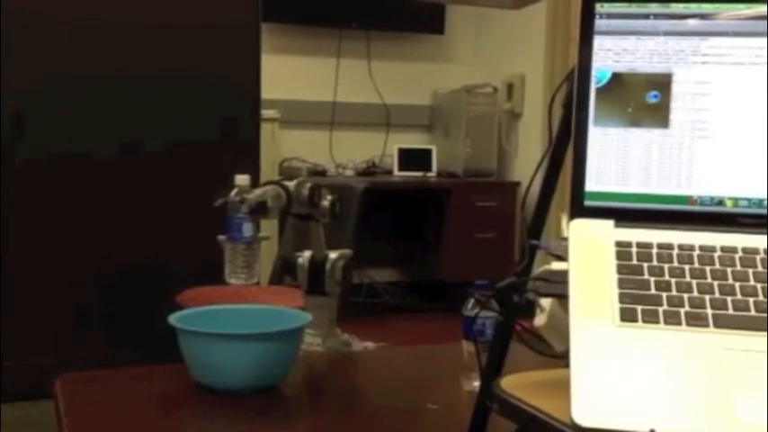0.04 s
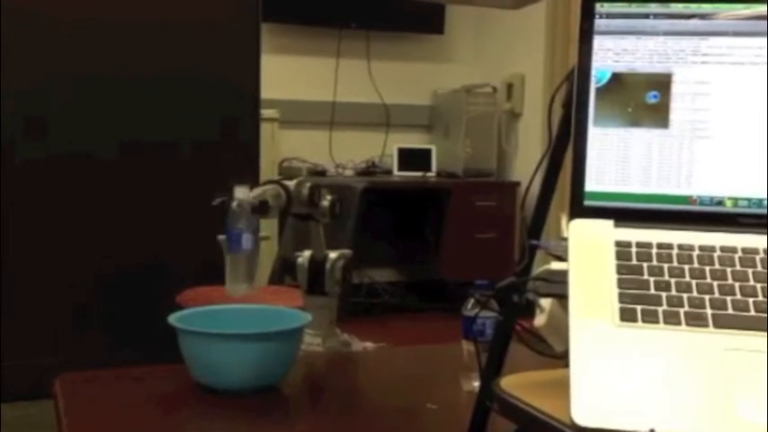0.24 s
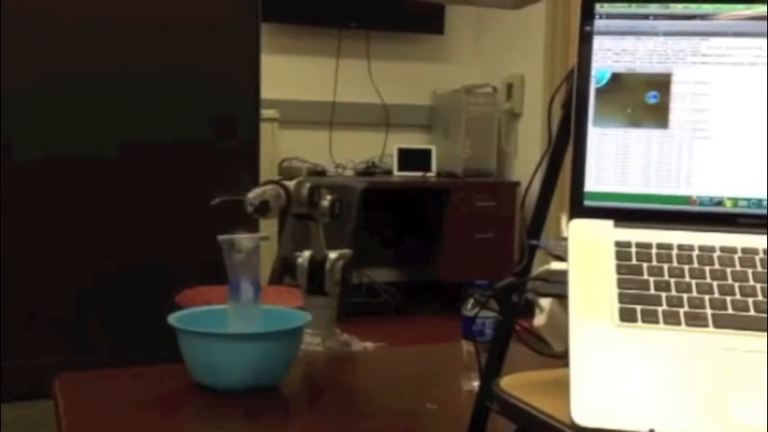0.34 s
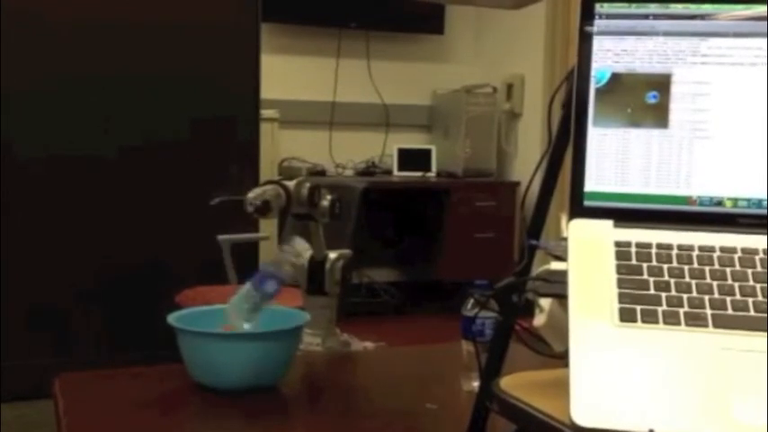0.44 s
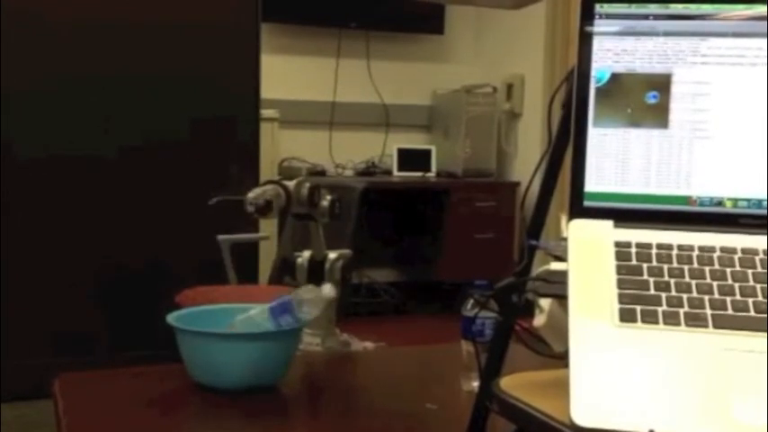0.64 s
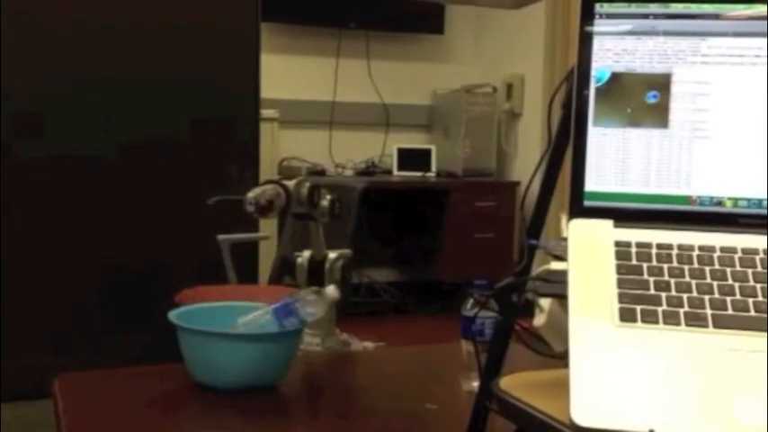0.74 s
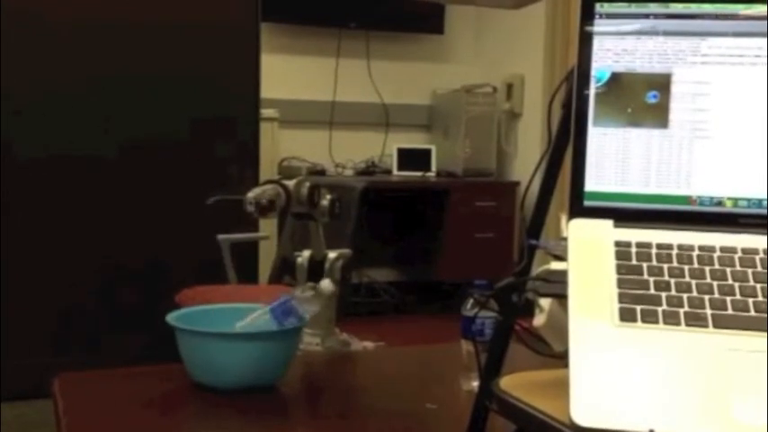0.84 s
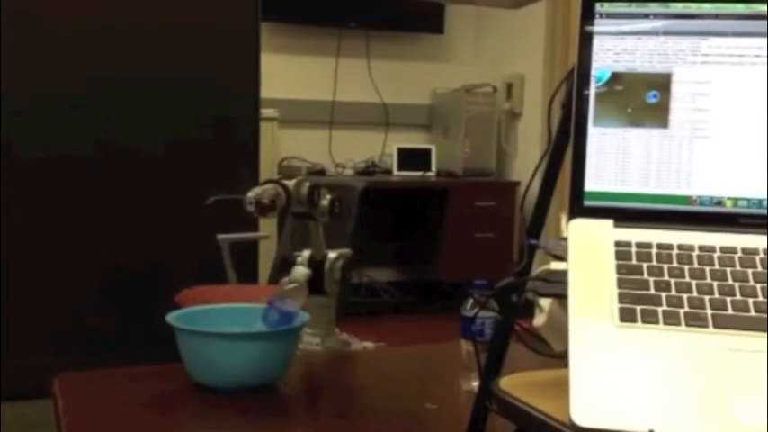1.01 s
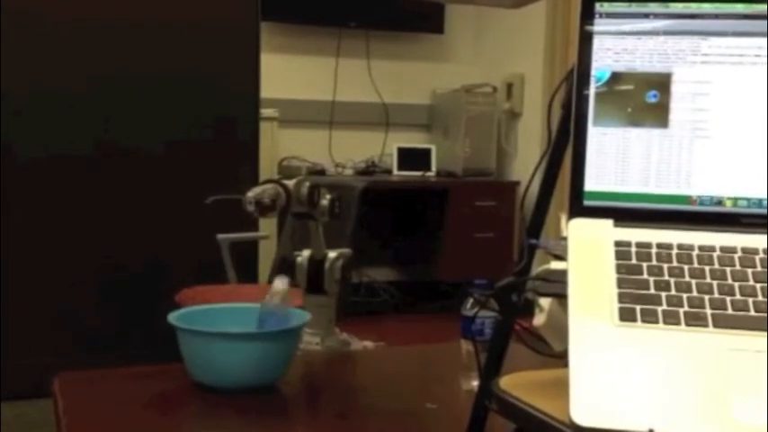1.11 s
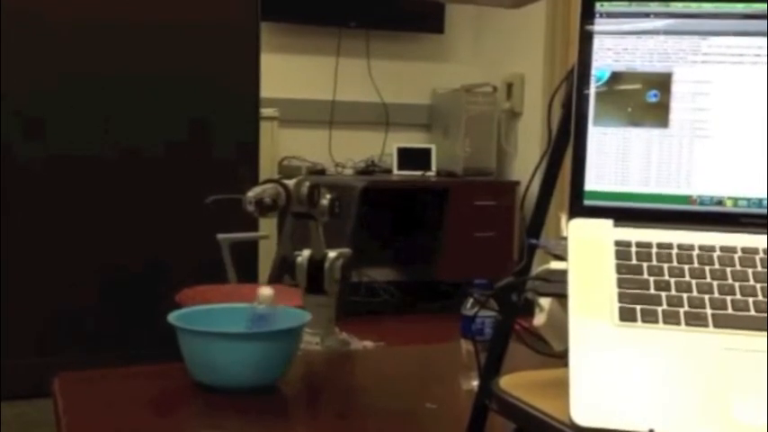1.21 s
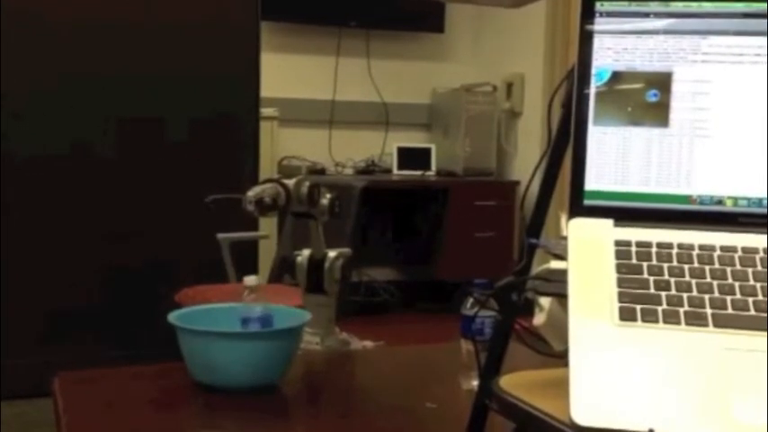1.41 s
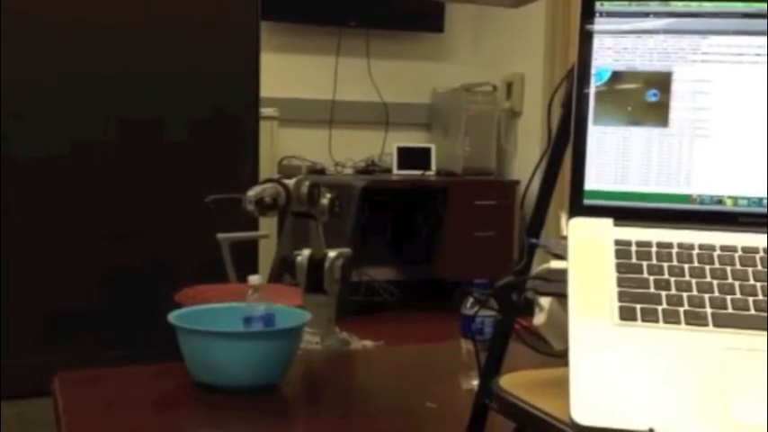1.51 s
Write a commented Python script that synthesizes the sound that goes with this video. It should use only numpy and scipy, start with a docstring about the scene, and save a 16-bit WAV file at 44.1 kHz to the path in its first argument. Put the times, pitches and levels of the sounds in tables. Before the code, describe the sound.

Thin plastic bottle clatters into a plastic bowl, then rocks with faint bumps.

```python
"""A thin plastic bottle drops into a plastic bowl on a table: small, quiet room, one microphone close by.
It clips the rim, squeaks down the wall, slams onto the bottom, tumbles and rocks to rest with faint bumps.
Each contact thumps the bowl and makes the bottle's shell knock, crack and crinkle. A few blows reach
the table top, and the flexing bottle ticks. Behind it are the room's short answer and a steady room tone."""
import sys
import numpy as np
from scipy import signal
from scipy.fft import rfft, irfft
from scipy.io import wavfile
from scipy.ndimage import uniform_filter1d

SR = 44100
rng = np.random.default_rng(int(sys.argv[2]) if len(sys.argv) > 2 else 0)


def wrap_up_sound(samples):
    """Save the sound to the file named by the first command line argument, as 16-bit audio."""
    columns = np.atleast_2d(samples).T
    # keep every value between -1 and 1, then stretch to whole-number steps
    tamed = np.clip(columns, -1, 1)
    steps = np.round(tamed * 32767).astype(np.int16)
    wavfile.write(sys.argv[1], SR, steps)


N = 68355
HIT_T = np.arange(SR // 3) / SR
ROOM_T = np.arange(2 * SR // 3) / SR


# Bottle meets bowl: t/s, thump level/dB, thump centre f/Hz, knock level/dB, knock centre f/Hz,
# crack level/dB, crinkle level/dB, rattle t60/s, room send/dB. contact() trims the four levels.
CONTACT_LOG = [ (0.0618, -63, 294, -51.5, 1870, -51, -58, 0.013, -3),
               (0.2037, -52.5, 440, -35, 1178, -46, -63, 0.018, -1),
               (0.2072, -54, 437, -42.5, 1390, -37, -34, 0.018, -1.5),
               (0.2177, -74, 400, -41, 1310, -47, -48, 0.006, -23),
               (0.2201, -82, 400, -43, 1300, -42.5, -46, .016, -7),
               (0.2738, -63, 395, -46.5, 2220, -40.5, -62, 0.016, -2),
               (0.291, -64, 400, -37, 1490, -40, -63.5, 0.0089, -5),
               (0.3341, -56.5, 400, -32.5, 1560, -39, -47, 0.016, -3.5),
               (0.3997, -35.5, 202, -29.5, 1182, -41, -37, 0.012, -1),
               (0.4025, -35, 470, -26.5, 1476, -24, -28.5, 0.0029, -6),
               (0.404, -38, 182, -29.5, 2050, -20.5, -24, .007, -7),
               (0.4722, -28, 392, -32.5, 1840, -39, -47, 0.026, -3),
               (0.479, -44, 480, -31.5, 1580, -43, -53, 0.029, -6.5),
               (0.511, -43.5, 530, -40, 1600, -49.5, -68.5, 0.016, -4),
               (0.5947, -45.5, 300, -38, 1550, -35.5, -35.5, 0.011, -5.5),
               (0.5974, -38.5, 352, -33, 1510, -29.5, -35, 0.039, -2),
               (0.607, -43, 199, -47, 1500, -39, -34.5, 0.01, -2),
               (0.6134, -49, 176, -34, 2050, -29, -29, 0.031, -4.5),
               (0.6538, -42.5, 302, -41, 1540, -72, -67.5, 0.021, -5),
               (0.6713, -46, 240, -46, 1730, -54.5, -61, 0.013, -9),
               (0.8591, -48, 238.5, -44.5, 1746, -56, -73.5, 0.015, -4),
               (0.931, -52.5, 288, -49, 1725, -68, -84.5, 0.016, -7),
               (1.01, -57.5, 197, -57.5, 1993, -68, -83.5, 0.034, 0.5),
               (1.031, -59.5, 300, -52, 1850, -64, -79.5, 0.029, -4.5),
               (1.094, -55.5, 280, -48.5, 1950, -66, -78.5, 0.062, -5),
               (1.113, -51, 257, -54.5, 1546, -65, -66, 0.1, 6.5),
               (1.1473, -55, 243, -49, 2340, -56, -67.5, 0.039, 1.5),
               (1.1884, -41.5, 270, -39, 1480, -53.5, -70, .014, -6),
               (1.193, -44, 268, -44, 2580, -50, -61.5, 0.02, -2),
               (1.469, -69.5, 300, -61, 1740, -81, -82, 0.017, -7)]

def falling_bottle(room_delay_s=0.005):
    """Each contact reaches the microphone directly, then by way of the walls."""
    out = np.zeros(N)
    walls = room_bands()
    for start, *blow, send_db in CONTACT_LOG:
        hit = contact(*blow)
        add(out, start, hit)
        add(out, start + room_delay_s, undb(send_db) * reflections(hit, *walls))
    return out


# Modes of the bowl, the bottle's body and its ribbed wall: f/Hz, relative level/dB, t60/s
BOWL_MODES = [(170, -10, 0.2), (186.5, -6, 0.14), (278.5, -8.5, 0.1), (339.6, 1.5, 0.039),
              (420, -7.5, 0.092), (490, 0, 0.045), (523, -9.5, 0.056), (613, -9, .06)]
BOTTLE_MODES = [(835, -7.5, 0.024), (1050, -7, .022), (1270, -4, .022), (1497, -1, .022),
                (1690, -3.5, 0.018), (2016, -3.5, .024), (2206, -5.5, .026), (2473, -7.5, 0.02)]
RIB_MODES = [(3440, -3.5, 0.027), (3610, -8, 0.024), (4138, -0.5, 0.014), (4630, -0.5, .012),
             (5060, 1, 0.0092), (5460, -8, 0.02), (6223, -5, 0.024)]
# Spectrum of the bottle's crinkling skin: f/Hz, relative level/dB
SKIN_SPECTRUM = [(5500, -33), (6900, -3), (7500, 2), (9000, 1), (10500, -4.5), (11700, -10), (13000, -5),
                 (15000, -14), (16000, -29.5)]

def contact(thump_db, thump_hz, knock_db, knock_hz, crack_db, crinkle_db, t60):
    """One blow: the bowl thumps, the bottle knocks, its ribs crack and its skin crinkles."""
    attack = 1 - np.exp(-HIT_T / 0.00036)
    # The crack is brightest in a hard blow and sinks as the crinkle falls under it.
    crack_hz = 5000 * 2 ** (0.01 * min(crinkle_db - crack_db, 0))
    thump = struck(BOWL_MODES, thump_hz, octave_db=7.5, spread=1.7, dense_db=-5.5, t60=0.022)
    knock = struck(BOTTLE_MODES, knock_hz, octave_db=7, spread=1.55, dense_db=-1.5, t60=t60)
    crack = struck(RIB_MODES, crack_hz, octave_db=13.5, spread=1.45, dense_db=3.5, t60=t60)
    crinkle = colour(rng.standard_normal(len(HIT_T)), SKIN_SPECTRUM) * fade(HIT_T, t60)
    return (burst(attack * thump, thump_db + 2.5) + burst(attack * knock, knock_db - 0.5)
            + burst(attack * crack, crack_db - 1) + burst(attack * crinkle, crinkle_db - 1.5))


def struck(modes, centre_hz, octave_db, spread, dense_db, t60):
    """A blow excites clear modes and a wash of dense ones around a centre, lower for softer contact."""
    favoured = [(hz, db - octave_db * np.log2(hz / centre_hz) ** 2, decay) for hz, db, decay in modes]
    band = signal.butter(5, (centre_hz / spread, centre_hz * spread), "band", fs=SR, output="sos")
    dense = signal.sosfilt(band, rng.standard_normal(len(HIT_T)) * fade(HIT_T, t60))
    return ring(favoured) + undb(dense_db) * unit(dense)


def ring(modes, scatter_db=2):
    """Damped modes; their strengths and signs depend on the spot that is struck."""
    hz, db, t60 = np.array(modes).T[:, :, None]
    scatter, side = rng.standard_normal((2, len(modes), 1))
    strength = np.sign(side) * undb(db + scatter_db * scatter)
    return unit(np.sum(strength * fade(HIT_T, t60) * np.sin(2 * np.pi * hz * HIT_T), axis=0))


# Slides on the bowl's wall: t/s, length/s, f/Hz, level/dB
SLIDES = [(0.39, .011, 2414, -31), (1.105, 0.032, 4200, -59.5), (1.146, 0.0073, 2560, -43),
          (1.147, 0.01, 3750, -56)]

def squeaks(waver=0.031):
    """Plastic rubs on plastic: brief, unsteady tones."""
    out = np.zeros(N)
    for start, length, hz, db in SLIDES:
        swell = np.sqrt(np.abs(np.sin(np.pi * np.minimum(HIT_T / length, 1))))
        drift = uniform_filter1d(rng.standard_normal(len(HIT_T)), size=100)
        pitch = hz * (1 + waver * drift / np.std(drift))
        add(out, start, undb(db) * swell * np.sin(2 * np.pi * np.cumsum(pitch) / SR))
    return out


# Blows that reach the table under the bowl: t/s, level/dB
TABLE_BLOWS = [(0.3988, -39), (0.612, -51), (1.122, -60), (1.189, -51.5)]

def table_thuds(push_s=0.0083, ring_hz=111, ring_db=-4):
    """Soft pushes on the table top, each with a short, low ring."""
    push = np.sin(np.pi * np.minimum(HIT_T / push_s, 1)) ** 2
    tone = np.sin(2 * np.pi * ring_hz * HIT_T) * fade(HIT_T, t60=0.086)
    thud = unit(push) + undb(ring_db) * unit(tone)
    out = np.zeros(N)
    for start, db in TABLE_BLOWS:
        add(out, start, burst(thud, db))
    return out


# Ticks of the bottle: t/s, level/dB
FLEX_TICKS = [(0.963, -67.5), (0.977, -69), (0.9872, -60.5)]
# Modes that a tick rings: f/Hz, relative level/dB, t60/s
FLEX_MODES = [(4270, 0.5, .015), (5570, -2.5, 0.012), (6310, -2.5, 0.0087), (12230, 1, .012),
              (12770, -7.5, .01)]

def ticks():
    """The bottle flexes with tiny, high ticks, faint at the microphone."""
    out = np.zeros(N)
    for start, db in FLEX_TICKS:
        add(out, start, burst(ring(FLEX_MODES), db))
    return out


# The small room's reverberation by band: f/Hz, level/dB, t60/s
REVERB_BANDS = [(100, -0.5, 0.18), (250, -2.5, 0.4), (500, -2.5, 0.3), (961, -2, 0.25), (2040, -3, 0.27),
                (4000, -3.5, 0.29), (8000, -5.5, 0.24), (15000, -11.5, .25)]

def room_bands(build_s=0.0048, early_db=-5.5):
    """Each band's share of the spectrum and its envelope: early reflections plus a longer tail."""
    hz, db, t60 = np.array(REVERB_BANDS).T
    log_f = np.log(np.maximum(np.fft.rfftfreq(len(ROOM_T), 1 / SR), 1))
    shares = [np.interp(log_f, np.log(hz), row) for row in np.eye(len(hz))]
    build = np.minimum(ROOM_T / build_s, 1)
    early = undb(early_db) * unit(build * fade(ROOM_T, t60=0.11))
    tails = [undb(level) * unit(build * fade(ROOM_T, decay)) for level, decay in zip(db, t60)]
    return np.array(shares), np.hypot(early, tails)


def reflections(hit, shares, envelopes):
    """The walls return one blow; the pattern changes as the bottle turns."""
    bands = irfft(shares * rfft(rng.standard_normal(len(ROOM_T))), len(ROOM_T))
    return signal.fftconvolve(hit, np.sum(bands * envelopes, axis=0))


# Noise floor of the room: f/Hz, relative level/dB (spectral density)
ROOM_TONE_SPECTRUM = [(25, -17), (60, -3), (110, 0.5), (170, 2.5), (280, -5.5), (450, -5), (700, -13.5),
                      (1200, -15), (1900, -18), (3000, -23.5), (6000, -25), (12000, -28), (16000, -28)]

def room_tone(rms_db=-60.5):
    """Steady, low noise of the air around the microphone."""
    air = colour(rng.standard_normal(N), ROOM_TONE_SPECTRUM)
    return undb(rms_db) * air / np.std(air)


def undb(db):
    """Decibels to gain."""
    return 10 ** (np.asarray(db) / 20)


def unit(x):
    """Scale to unit energy."""
    return x / np.sqrt(np.sum(x ** 2) + 1e-18)


def burst(x, db, window_s=0.01):
    """Give a short sound the energy of window_s at this level."""
    return unit(x) * undb(db) * np.sqrt(window_s * SR)


def fade(t, t60):
    """Exponential decay, 60 dB down at t60."""
    return np.exp(-np.log(1000) * t / t60)


def add(out, start, x):
    """Mix x into out from this time on."""
    i = int(start * SR)
    out[i:i + len(x)] += x[:len(out) - i]


def colour(x, points):
    """Shape the spectrum by (f/Hz, level/dB) points."""
    hz, db = np.array(points).T
    f = np.maximum(np.fft.rfftfreq(len(x), 1 / SR), 1)
    gain = undb(np.interp(np.log(f), np.log(hz), db))
    return irfft(rfft(x) * gain, len(x))


# Colour of the bowl's sound where the microphone stands: f/Hz, level/dB
MIC_POSITION = [(100, 0), (200, 0.5), (500, -0.5), (750, -1.5), (1100, -0.5), (1600, 1), (2300, 0.5),
                (2900, -2), (3700, 0.5), (5300, 0.5), (6600, -2.5), (8000, 0)]

def scene():
    """Bottle, bowl and table from the microphone's position, in mono over the room tone."""
    drop = falling_bottle() + table_thuds() + ticks() + squeaks()
    return (colour(drop, MIC_POSITION) + room_tone())[None]


def record(dry, low_cut_hz=35, top_hz=15500):
    """The recorder thins the deepest bass and cuts the top."""
    low_cut = signal.butter(1, low_cut_hz, "high", fs=SR, output="sos")
    high_cut = signal.ellip(10, 0.2, 80, top_hz, fs=SR, output="sos")
    return signal.sosfilt(high_cut, signal.sosfilt(low_cut, dry))


dry = scene()
out = record(dry)
wrap_up_sound(out)
```